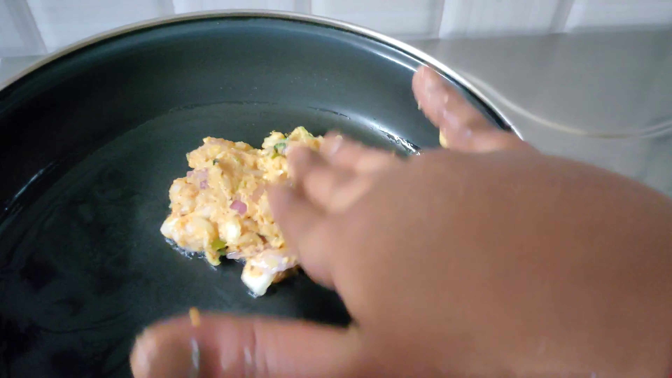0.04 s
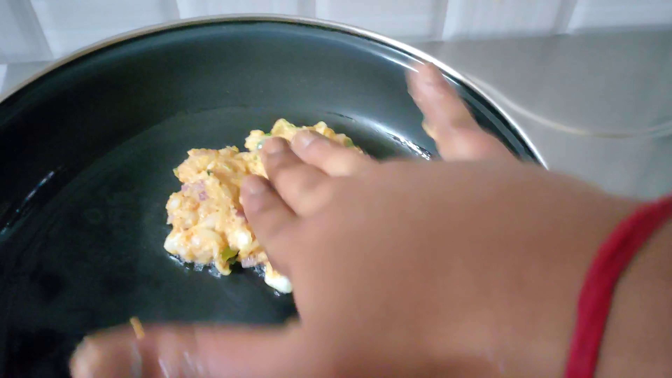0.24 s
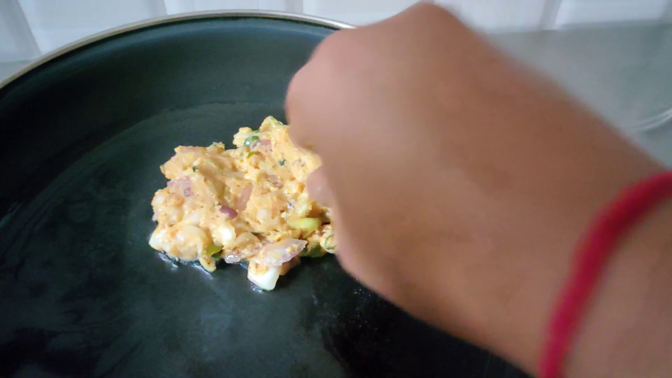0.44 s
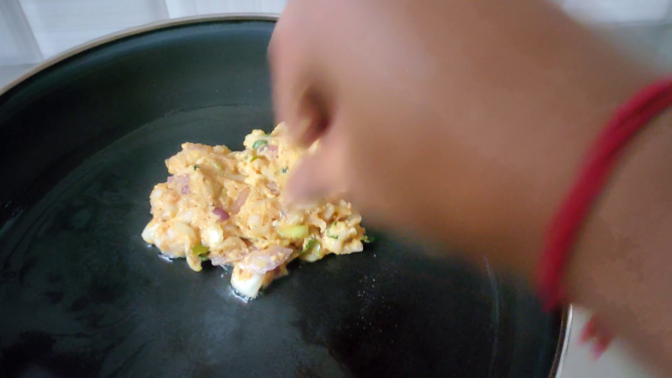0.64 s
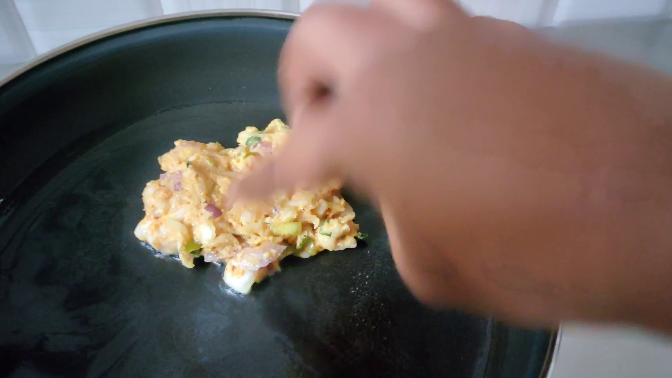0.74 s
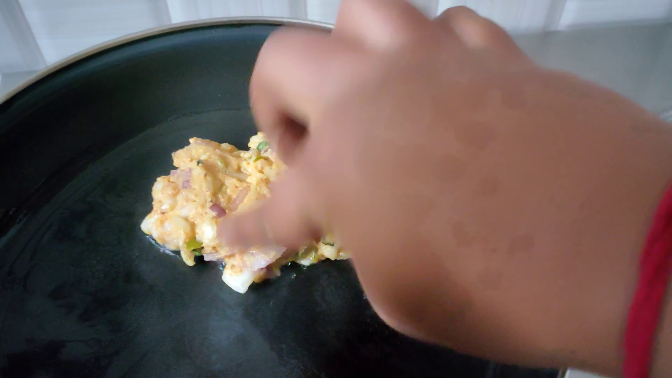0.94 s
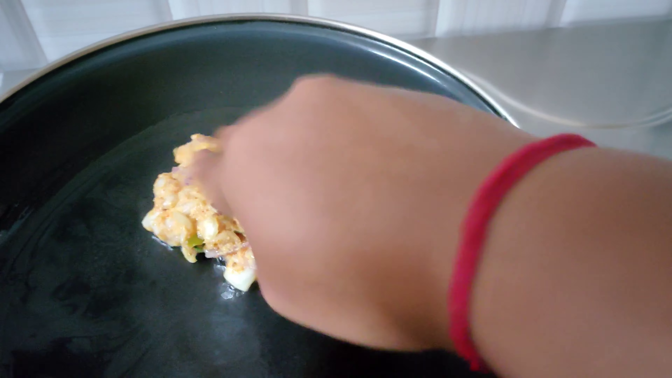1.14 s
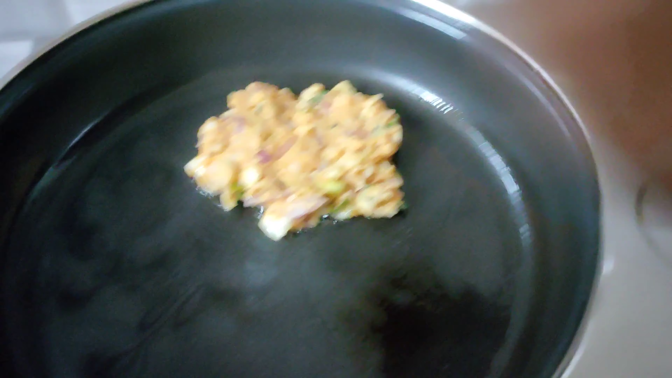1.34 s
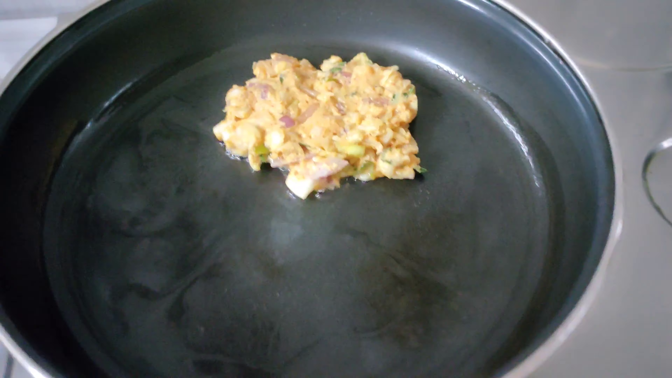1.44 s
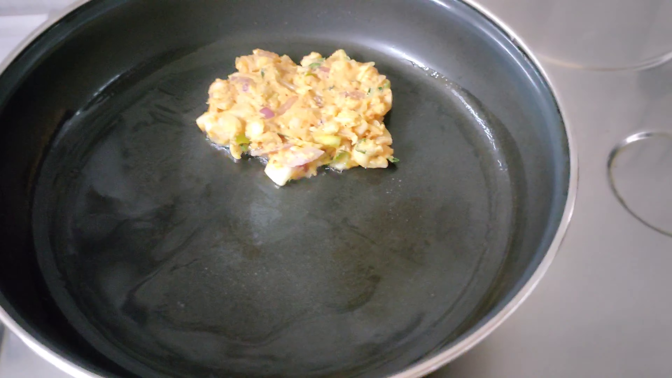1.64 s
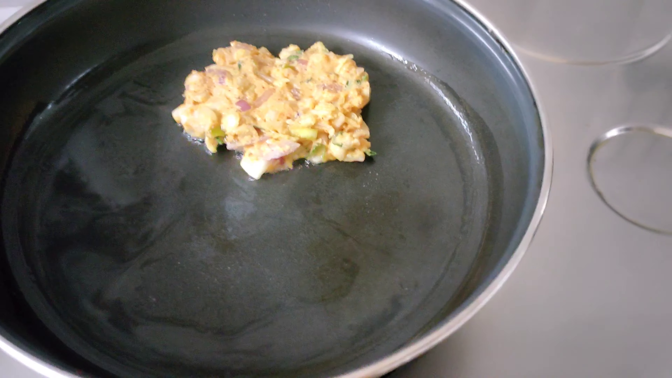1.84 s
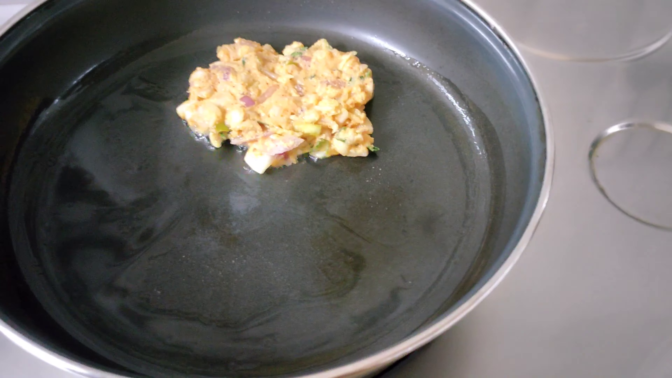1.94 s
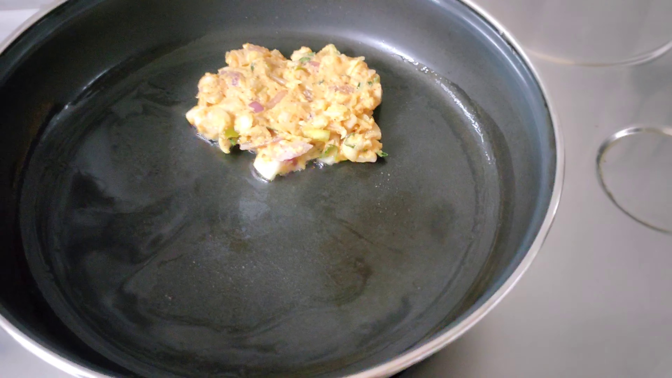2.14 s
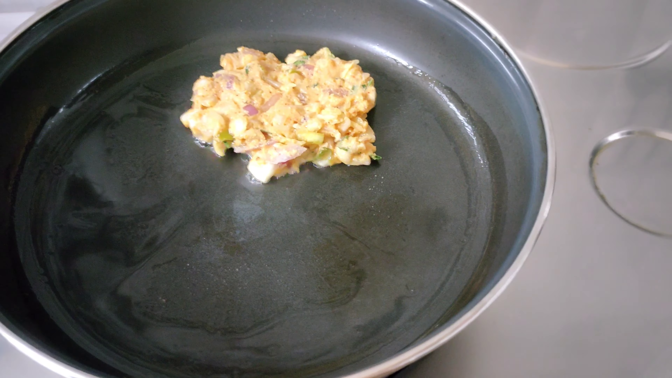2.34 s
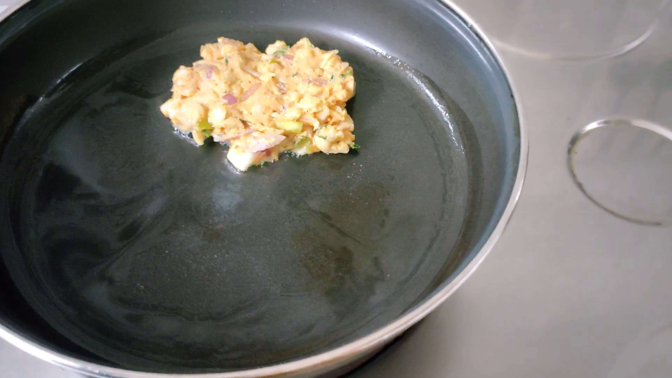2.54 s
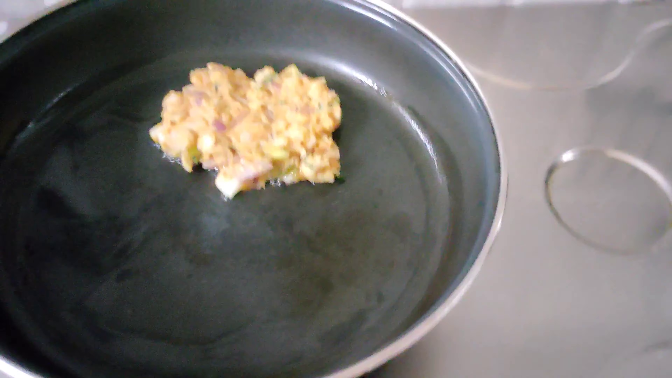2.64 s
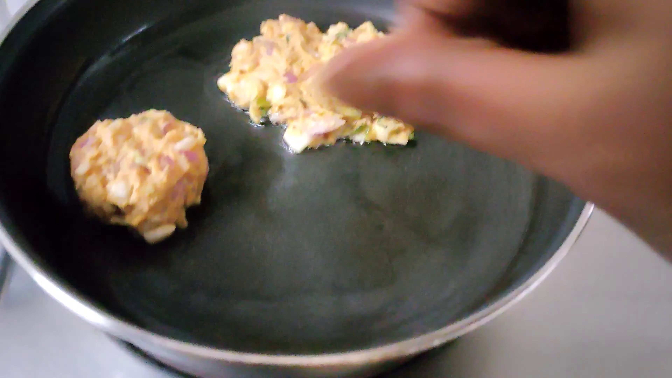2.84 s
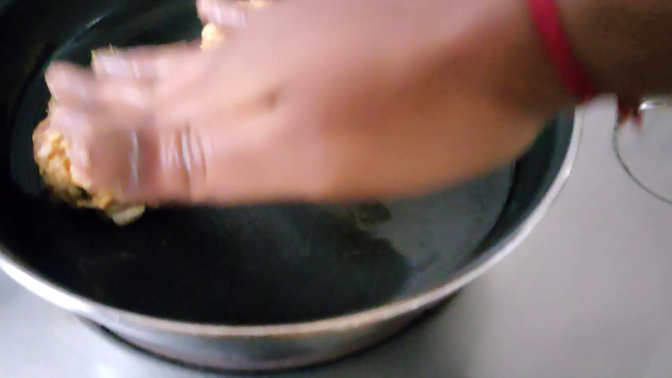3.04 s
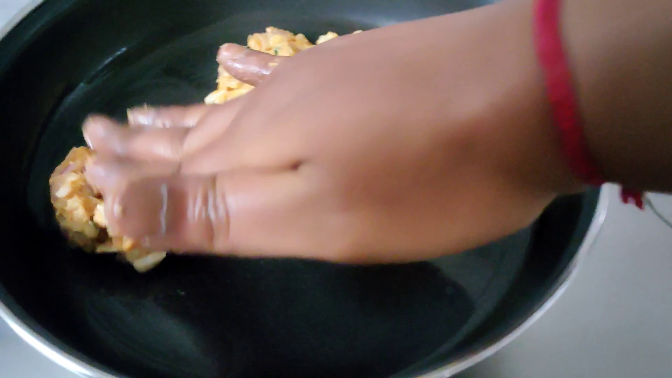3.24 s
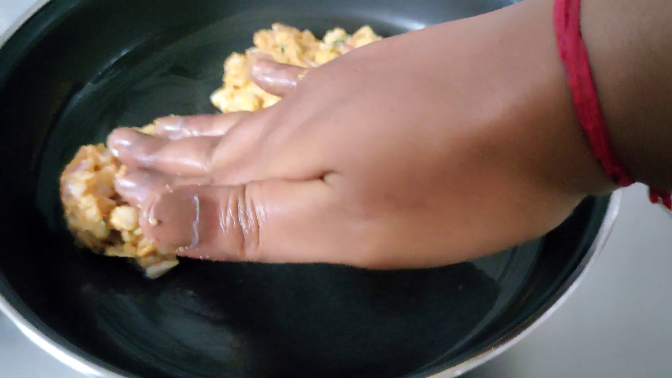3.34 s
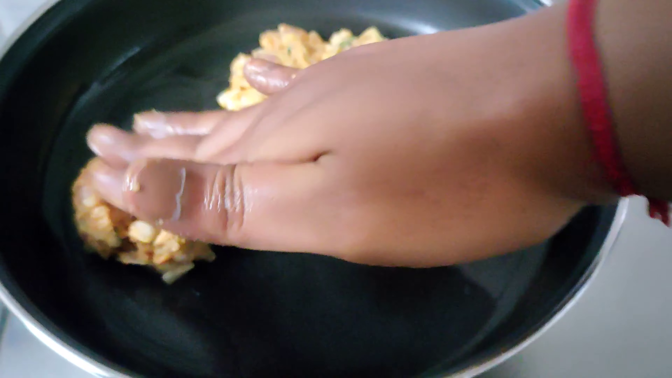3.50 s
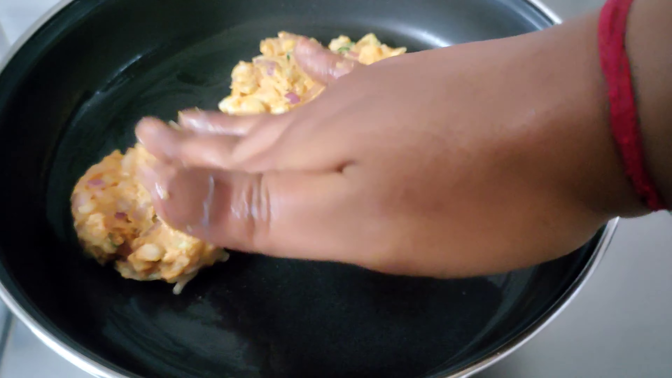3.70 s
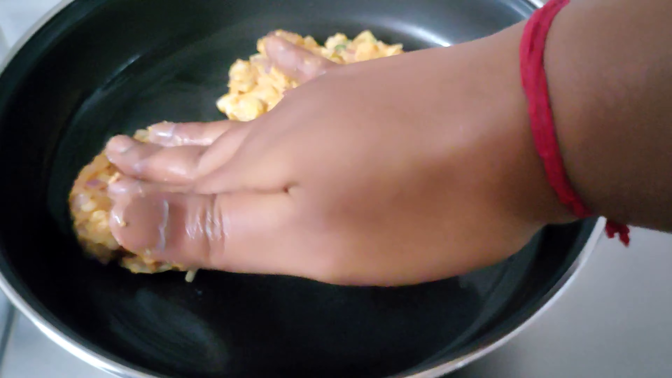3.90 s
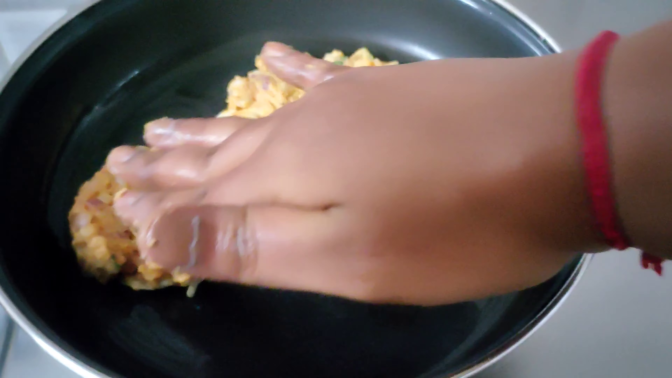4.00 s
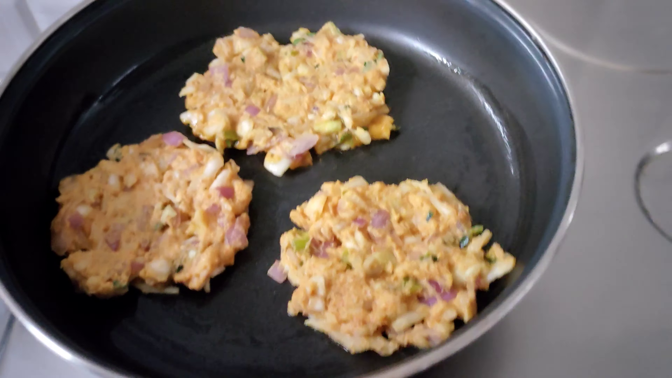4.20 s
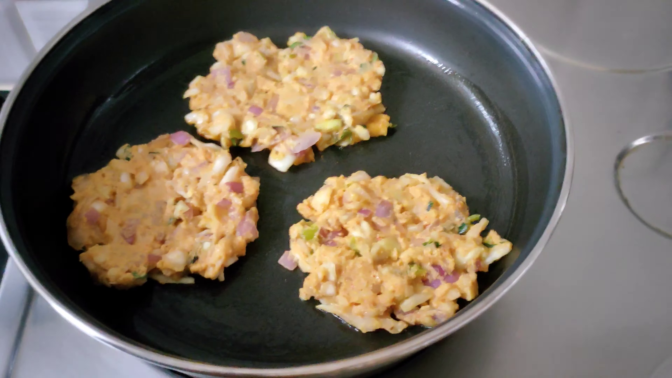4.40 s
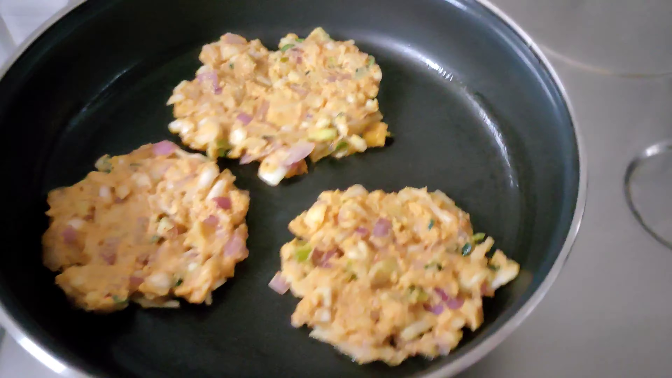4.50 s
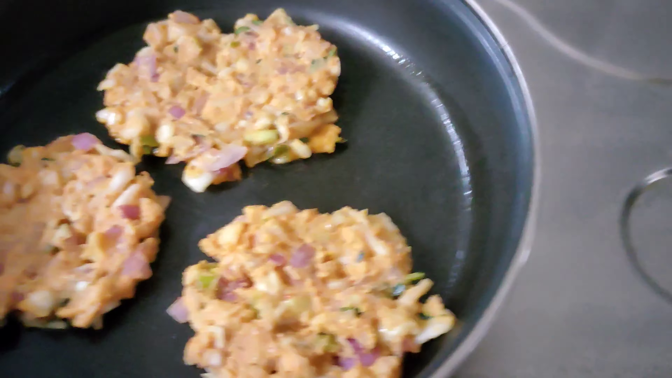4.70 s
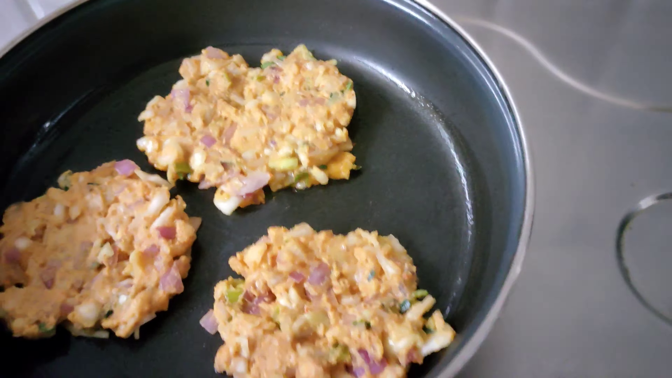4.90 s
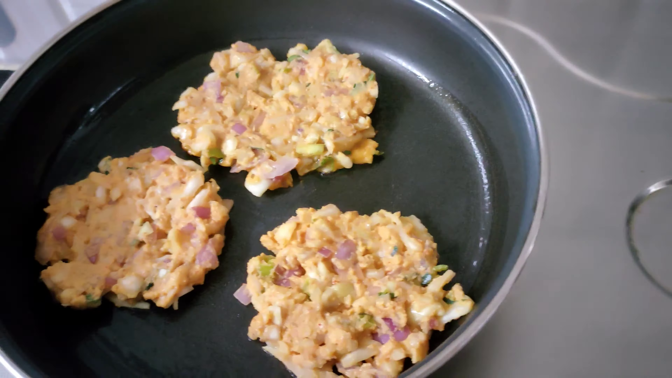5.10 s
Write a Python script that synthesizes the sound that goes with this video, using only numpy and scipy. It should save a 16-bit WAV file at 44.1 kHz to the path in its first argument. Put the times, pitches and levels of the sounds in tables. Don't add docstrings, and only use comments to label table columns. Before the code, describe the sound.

Close frying hiss over a low wavering hum, early loud oil pops, a burst of metallic pan knocks midway, then short scraping squeaks.

```python
import sys
import numpy as np
from scipy import signal
from scipy.fft import rfft, irfft, next_fast_len
from scipy.io import wavfile
from scipy.ndimage import uniform_filter1d

SR = 44100
rng = np.random.default_rng(int(sys.argv[2]) if len(sys.argv) > 2 else 0)


def wav_out(sig):
    wavfile.write(sys.argv[1], SR, np.round(np.clip(np.atleast_2d(sig).T, -1, 1) * 32767).astype(np.int16))


def volts_from_decibels(level):
    exponent = np.asarray(level, float) / 20
    return 10 ** exponent


N = 262395
FULL_PAN_S = 3.95

# freq_hz, level_db (per Hz)
HISS_THREE = [(190, -26), (330, -6), (671, -4.5), (1220, -6), (1550, -2.5), (1980, -4.5), (2600, -2),
              (3160, -5), (5740, 1.5), (9010, -6), (11100, -7), (13700, -16), (15600, -11)]
# freq_hz, width_hz, level_db
STAND = [(180, 165, -11.5), (221, 46, -2.5), (326, 40, 2), (387, 76, -2), (447, 35, 5), (589, 16, -7),
         (647, 22, -4.5), (750, 91, -4), (880, 105, -7), (1195, 83, -11), (1328, 30, -6.5),
         (1670, 140, -18.5), (1950, 180, -16.5)]
# freq_hz, level_db (per Hz)
CLATTER = [(590, -17.5), (1000, -8.5), (1350, -4.5), (2210, -9.5), (2690, -7.5), (3230, -11), (5870, -13),
           (8290, -23), (11400, -24.5), (14900, -38), (15600, -40)]


def evened(x):
    return x / np.sqrt(np.mean(x ** 2) + 1e-20)


def smooth_noise(shape, size):
    return evened(uniform_filter1d(rng.standard_normal(shape), size=size))


def read(points, hz):
    f, value = np.transpose(points)
    return np.interp(np.log(hz + 1), np.log(f + 1), value)


def columns(rows, t):
    s, *rest = np.transpose(rows)
    return [np.interp(t, s, c) for c in rest]


def add(mix, s, sound):
    part = mix[:, max(round(s * SR), 0):][:, :sound.shape[1]]
    part += sound[:, :part.shape[1]]


def ring(x, modes):
    out = np.zeros_like(x)
    for k, (hz, width, db) in enumerate(modes):
        r = np.exp(-np.pi * max(width, 5) / SR)
        poles = [1, -2 * r * np.cos(2 * np.pi * hz / SR), r * r]
        out += (-1) ** k * volts_from_decibels(db) * (1 - r) * signal.lfilter([1, 0, -r], poles, x)
    return out


def colour(x, points):
    size = next_fast_len(x.shape[-1])
    gain = volts_from_decibels(read(points, np.fft.rfftfreq(size, 1 / SR)))
    return irfft(rfft(x, size) * gain, size)[..., :x.shape[-1]]


def pair(size, same):
    a, b = rng.standard_normal((2, size))
    return np.array([a, same * a + np.sqrt(1 - np.clip(same, 0, 1) ** 2) * b])


def panned(db):
    return volts_from_decibels(np.array([[.5 * db], [-.5 * db]]))


def hiss():
    # start_s, level_db
    frying = [(0.0, -45.5), (0.238, -49), (1.12, -50.5), (1.14, -45.5), (1.225, -50), (1.346, -53.5),
              (1.58, -55.5), (1.95, -52.5), (2.452, -54), (2.97, -52.5), (2.99, -49.5), (3.254, -47),
              (3.454, -52.5), (3.804, -49), (3.96, -51.5), (4.226, -51.5), (5.074, -53), (5.95, -52.5)]
    # freq_hz, level_db (per Hz)
    hiss_one = [(190, -37), (330, -3), (562, -6.5), (629, 0), (828, -10.5), (1040, -1), (1850, 1.5),
                (2110, 0), (2400, 3), (4880, 2), (5830, 2.5), (11700, -7), (15600, -10.5)]
    # freq_hz, likeness (0 to 1)
    likeness = [(60, 0.97), (180, 0.71), (550, 0.66), (1650, 0.16), (4970, 0.018), (15000, 0.03)]
    calm_db = -53
    top_lag, wash_lag = 0.097, 0.51
    top_db, wash_db = (1.3, -2.5), (3.5, 2)

    frames, hz = N // 64 + 5, np.fft.rfftfreq(256, 1 / SR)[:, None]
    t = np.arange(frames) * 64 / SR
    a, b, c, d, patches = rng.standard_normal((frames, 129, 5)).T
    patches = evened(uniform_filter1d(uniform_filter1d(patches, size=5, axis=0), size=40, axis=1))
    flicker = smooth_noise(frames, 8)

    level_db, = columns(frying, t)
    full = np.clip((t - FULL_PAN_S) / 0.0205, 0, 1)
    bright_db = np.interp(full, (0, 1), top_db) - top_lag * (level_db - calm_db)
    low_db = np.interp(full, (0, 1), wash_db) - wash_lag * (level_db - calm_db)
    shape_db = (1 - full) * read(hiss_one, hz) + full * read(HISS_THREE, hz)
    shape_db -= 10 * np.log10((volts_from_decibels(shape_db[17:52]) ** 2).sum(0))
    shape_db += bright_db * np.clip((hz - 6500) / 4000, 0, 1)
    shape_db += low_db * np.clip((3000 - hz) / 1500, 0, 1)

    pops = rng.choice([-1, 1], N) * (rng.random((2, N)) < 300 / SR)
    pops = pops * volts_from_decibels(4.0 * np.minimum(rng.exponential(1, (2, N)), 4))
    pops = evened(pops + 0.059 * np.roll(pops[::-1], 6))
    crackle = signal.stft(pops, nperseg=256, noverlap=192)[2]
    crackle = np.pad(crackle, ((0, 0), (0, 0), (0, 8)))[:, :, :frames]
    crackle_db = -13.0 + 3.6 * np.clip((hz - 3000) / 5000, -1, 1)

    same, left = np.clip(read(likeness, hz), -1, 1), a + 1j * b
    z = np.array([left, same * left + np.sqrt(1 - same ** 2) * (c + 1j * d)])
    z += volts_from_decibels(crackle_db) * evened(abs(crackle)) * np.exp(1j * np.angle(crackle))
    uneven_db = 1.52 * patches + 0.36 * flicker * (4.0 - 0.61 * full)
    side_db = np.array([.5, -.5])[:, None, None] * (2.0 * full - 2.0) * (hz > 900)
    z *= volts_from_decibels(shape_db + level_db + uneven_db + side_db)
    return volts_from_decibels(2.5) * signal.istft(z, nperseg=256, noverlap=192)[1][:, :N]


def hum():
    # start_s, load_db (second tone), imbalance_db (first tone against the second)
    motor = [(0.0, -52.5, 4.5), (0.5, -59, -2), (0.53, -68, 13), (0.69, -51.5, 3), (0.99, -64.5, 11.5),
             (1.24, -51, -24), (2.15, -56.5, 4), (2.45, -73, 7), (2.48, -54, -11), (2.8, -47, -2),
             (3.89, -45.5, -2.5), (3.99, -62.5, 13), (4.19, -53, -2), (4.44, -63, 13), (4.56, -53, -1.5),
             (5.24, -73, 20), (5.29, -52.5, 2), (5.95, -52.5, 1)]
    # start_s, pitch_hz
    shaft = [(0, 97), (1.1, 99), (1.9, 92), (2.45, 86), (2.75, 92.3), (5.95, 92)]
    # freq_hz, level_db (per Hz)
    rumble_colour = [(8.8, -30), (20, -13), (38, -4), (92, -1), (111, -7.5), (141, -7), (283, -23.5),
                     (330, -38), (430, -37), (730, -120)]
    third_db = (-15.5, -5)
    throb_db, rumble_db, lumps_db = 2.5, -54.5, .8

    t = np.arange(N) / SR
    load_db, imbalance_db = columns(motor, t)
    waver = evened(uniform_filter1d(smooth_noise((3, 4, N), 5000), size=5000))
    orders_db = np.array([imbalance_db, 0 * t, np.where(t < FULL_PAN_S, *third_db)])
    orders_db = orders_db + load_db + 1.0 + throb_db * waver[2, :3]
    turns = np.cumsum(.5 * columns(shaft, t)[0]) / SR
    drift = np.array([[.08], [.08], [.3]]) * waver[0, :3]
    drift = drift + .05 * waver[1, :3] * [[[0]], [[1]]]
    lines = 0
    for k, db in enumerate(orders_db):
        lines = lines + volts_from_decibels(db) * np.sin(2 * np.pi * ((k + 1) * turns + drift[:, k]))
    rumble = evened(colour(pair(N, 0.98), rumble_colour)) * volts_from_decibels(rumble_db + lumps_db * waver[2, 3])
    return panned(-0.1) * (lines + rumble)


def taps():
    # start_s, peak_db, pitch_hz, t60_s (time to die by 60 dB), left_right_db
    tap_events = [(0.055, -47, 330, 0.021, 4), (0.099, -51, 440, 0.07, 3), (1.192, -57, 330, 0.073, 0.5),
                  (1.252, -79, 320, 0.025, -0.5), (0.226, -48, 530, 0.025, 4), (0.269, -57, 492, 0.025, 0),
                  (2.4, -57, 440, .04, 2), (2.568, -54.5, 312, 0.067, 9), (2.572, -57, 516, 0.036, -4),
                  (3.986, -37, 438, 0.025, -34), (4.061, -60, 900, 0.2, -2), (4.328, -36, 463, 0.027, -23),
                  (4.355, -48, 480, 0.021, -16), (4.398, -44.5, 447, 0.031, -18),
                  (4.418, -43, 400, 0.013, -16), (4.438, -38, 400, 0.018, -22), (5.1, -55, 265, 0.023, -5),
                  (5.306, -37.5, 446, 0.012, -28)]
    out, t = np.zeros((2, N)), np.arange(3000) / SR
    for s, db, hz, t60, pan_db in tap_events:
        cycles = hz * t * (1 + 0.64 * np.exp(-t / 0.0011))
        knock = volts_from_decibels(db + 6.5 - 60 * t / max(t60, .005)) * np.sin(2 * np.pi * cycles)
        add(out, s, panned(pan_db) / panned(pan_db).mean() * knock)
    return out


def spits():
    # start_s, peak_db, pitch_hz, spray_db (noise around the spit)
    spit_events = [(0.1695, -22, 5830, -29), (0.163, -35, 3400, -3), (0.1762, -12.5, 4460, -19.5),
                   (0.1772, -9, 5270, -43), (0.2164, -35.5, 3450, -3), (0.2661, -48, 11100, -25),
                   (0.373, -37, 4150, -4.5), (0.386, -34, 4900, -3.5), (0.5212, -32.5, 2360, -2.5),
                   (0.605, -35, 6400, -4.5), (0.75, -41.5, 5070, -1.5), (0.8186, -39.5, 5670, -2.5),
                   (1.006, -39, 5700, -7), (1.0733, -36, 2600, -2.5), (1.141, -39, 2560, -1),
                   (1.1696, -25, 5800, -18), (1.2096, -35, 4350, -6), (1.2584, -39, 1640, -7),
                   (1.5217, -37, 10300, -13), (1.9023, -27.5, 6350, -12.5), (2.099, -33, 3870, -24),
                   (2.3782, -33.5, 5700, -9.5), (2.6063, -42, 2370, -7), (2.6482, -25.5, 9900, -28),
                   (2.8479, -35, 9000, -19), (2.934, -35, 6000, -15), (3.3074, -31, 2390, -7),
                   (3.5811, -40, 4380, 0), (3.6082, -35, 3970, -9.5), (5.8584, -35, 5500, -21)]
    middle_db, scatter_db = -2.1, 3.5
    out, t = np.zeros((2, N)), np.arange(-900, 1800) / SR
    envelope = np.exp(-np.maximum(t / 0.01, -t / 0.0057))
    for s, db, hz, spray_db in spit_events:
        pan_db = middle_db + scatter_db * rng.standard_normal()
        burst = np.sin(2 * np.pi * hz * t) * np.exp(-np.maximum(t, 0) * hz / 2.5) * (t > 0)
        burst = 0.83 * np.array([np.roll(burst, 9), burst])
        spray = evened(ring(pair(len(t), 0.23), [(hz, 0.79 * hz, 0)])) * envelope
        add(out, s + t[0], volts_from_decibels(db) * panned(pan_db) * (burst + volts_from_decibels(spray_db) * spray))
    return out


def ticks():
    # start_s, peak_db, lower_edge_hz, left_right_db
    tick_events = [(.1713, -27, 6500, -3), (.1766, -18, 800, 0), (.2205, -26, 700, 2),
                   (.2661, -20, 4500, -3), (.386, -32, 900, 0), (.522, -33, 700, -1), (.606, -35, 5000, -1),
                   (.642, -38, 6000, -1), (1.0062, -38, 5000, 0), (1.1404, -26, 900, 0),
                   (1.258, -38, 800, 0), (1.522, -37, 8000, -2), (1.5285, -34, 6000, 0),
                   (1.9017, -27, 600, -1), (1.9019, -31, 5000, -1), (2.003, -38, 4000, 0),
                   (2.6485, -26, 7000, -2), (2.9353, -34, 4000, -1), (3.3085, -29, 1500, 0),
                   (3.7625, -30, 900, 0), (4.7128, -25, 500, 2), (.697, -38, 5000, -1),
                   (2.849, -36, 6000, 0)]
    span = 8
    out, click = np.zeros((2, N)), np.zeros((2, 200))
    for s, db, hz, pan_db in tick_events:
        step = np.r_[1, rng.uniform(-1, 1, 20) * np.exp(-np.arange(20) / 7)]
        click[0, 4:25], click[1, :21] = step, step
        band = signal.butter(2, [hz, min(span * hz, 17000)], "band", fs=SR)
        add(out, s, 2 * volts_from_decibels(db) * panned(pan_db) * signal.lfilter(*band, click))
    return out


def jolts():
    # start_s, peak_db, clatter_db (against the thud), t60_s (clatter dies by 60 dB)
    jolt_events = [(3.042, -23.5, -14, 0.096), (3.069, -29, -13.5, 0.1), (3.156, -18, -26, 0.14),
                   (3.157, -11.5, -16.5, 0.16), (3.171, -19, -9.5, 0.14), (3.188, -22, -4.5, 0.073),
                   (3.209, -30, -38, 0.082), (3.277, -21, -19, 0.075), (3.308, -28, -30.5, 0.11),
                   (3.415, -31.5, 0, 0.07), (3.415, -12, -20, 0.087), (3.43, -21.5, -9.5, 0.15),
                   (3.456, -24, -27, 0.11), (3.505, -28, -39, 0.032), (3.645, -36.5, -30, 0.046),
                   (3.681, -48, -8, 0.21), (3.744, -53, 6, 0.23), (3.766, -21, -14.5, 0.13),
                   (3.795, -29, -15.5, 0.31), (3.836, -15, -14.5, 0.077), (3.842, -26, -14, 0.08),
                   (3.882, -17, -15.5, 0.067), (3.903, -26, -17, 0.03)]
    rise, grain_db = .012, 1.8
    out, t = np.zeros((2, N)), np.arange(8000) / SR
    high_gain = volts_from_decibels(2.0) / np.std(colour(pair(SR, 0.87), CLATTER))
    for s, db, bright_db, t60 in jolt_events:
        decay_db = 60 * np.maximum(t - rise, 0) / np.clip(t60, .02, .4)
        envelope = volts_from_decibels(db - decay_db) * np.clip(t / rise, 0, 1) ** 0.44
        envelope *= volts_from_decibels(2.67 * smooth_noise(len(t), 90))
        seat = np.array(STAND) * (1 + rng.standard_normal((len(STAND), 1)) * (.025, 0, 0))
        thud = evened(ring(envelope * pair(len(t), 0), seat))
        thud = volts_from_decibels(-9.0) * np.sqrt(np.mean(envelope ** 2)) * thud
        grains = evened(volts_from_decibels(grain_db * np.repeat(rng.exponential(1, 160).clip(0, 4), 50)))
        clatter = high_gain * volts_from_decibels(bright_db) * colour(envelope * grains * pair(len(t), 0), CLATTER)
        add(out, s + .005 - rise, thud + clatter)
    return ports(out + strikes())


def strikes():
    # start_s, peak_db
    strike_events = [(3.048, -16.5), (3.157, -9), (3.16, -14), (3.166, -7), (3.17, -14), (3.175, -14),
                     (3.19, -8.5), (3.201, -20), (3.209, -17), (3.278, -21), (3.308, -25), (3.413, -19),
                     (3.418, -14.5), (3.431, -16.5), (3.441, -19), (3.466, -20), (3.508, -25.5),
                     (3.518, -37), (3.77, -23), (3.832, -18), (3.84, -14), (3.883, -15.5), (3.888, -22),
                     (3.906, -17)]
    level_db, damp, snap_db = -7.5, 2.8, -12
    out, kick = np.zeros((2, N)), np.zeros((2, 3000))
    kick[0, 100:108] = kick[1, 135:143] = 1
    body = ring(kick, np.array(STAND) * (1, damp, 1))
    snap = colour(kick, CLATTER)
    blow = body / abs(body).max() + volts_from_decibels(snap_db) * snap / abs(snap).max()
    for k, (s, db) in enumerate(strike_events):
        add(out, s - 100 / SR, (-1) ** k * volts_from_decibels(db + level_db) * blow)
    return out


def ports(x):
    # freq_hz, likeness (0 to 1)
    near_same = [(200, 0.91), (400, 0.92), (750, 0.69), (1400, 0.16), (3000, 0.038), (8000, 0.089)]
    size = next_fast_len(N)
    hz, (a, b) = np.fft.rfftfreq(size, 1 / SR), rfft(x, size)
    same = np.clip(read(near_same, hz), 0, 1)
    right = (same * a + np.sqrt(1 - same ** 2) * b) * np.exp(2j * np.pi * hz * 6 / SR)
    return irfft(np.array([a, right]), size)[:, :N]


def slides():
    # freq_hz, width_hz, level_db
    rim_modes = [(770, 150, 8), (893, 64, 2.5), (497, 130, -5), (325, 170, -2)]
    # freq_hz, width_hz, level_db
    base_modes = [(1640, 59, -15), (2060, 110, -4.5), (2560, 110, -14), (3004, 68, -6)]
    # freq_hz, width_hz, level_db
    squeal_early = [(3710, 95, 0), (4690, 110, 11), (5830, 120, 3.5), (6600, 350, -6), (7200, 190, -17)]
    # freq_hz, width_hz, level_db
    squeal_late = [(3570, 36, 2), (4850, 120, 10), (5880, 90, 0), (6620, 440, 0), (7400, 190, -10)]
    rub_db, late_rub_db = -5, -8
    scratch, grit = .6, .6

    late = np.arange(N) >= 5.39 * SR
    rim_gain, squeal_gain, rim_hz = pushes()
    slips = volts_from_decibels(3.1 * smooth_noise(N, 150))
    rub = pair(N, 0)
    tone = np.sqrt(2) * np.sin(2 * np.pi * np.cumsum(rim_hz) / SR + np.array([[0], [.6]]))
    waver = volts_from_decibels(2.0 * smooth_noise(N, 400))
    rim = tone * waver + scratch * evened(ring(pair(N, 0.55), rim_modes))
    rim = rim * rim_gain * panned(-0.61)
    base = evened(ring(rub, base_modes)) * volts_from_decibels(rub_db + late_rub_db * late)
    squeal = np.where(late, evened(ring(rub, squeal_late)), evened(ring(rub, squeal_early)))
    squeal = evened(squeal + grit * evened(colour(rub, HISS_THREE))) * panned(0.77)
    return rim + (base + squeal) * squeal_gain * slips


def pushes():
    # start_s, push_s, ring_db, pitch_hz, t60_s (once released)
    ring_events = [
        (4.709, 0.028, -38.5, 770, 0.18),
        (4.784, 0.022, -44.5, 750, 0.076),
        (5.327, .026, -43.5, 756, 0.033),
        (5.352, 0.024, -42.5, 746, 0.054),
        (5.396, 0.034, -55, 722, .15),
        (5.428, 0.021, -52, 762, 0.22),
        (5.474, 0.013, -44, 742, 0.072),
        (5.492, 0.023, -53, 770, .06),
    ]
    # start_s, hold_s, squeal_db, rise_s
    squeal_events = [
        (4.711, .016, -31, .002),
        (4.77, 0.03, -48.5, .002),
        (5.342, 0.015, -42.5, .006),
        (5.365, 0.019, -50, 0.0043),
        (5.407, .025, -47, .01),
        (5.427, 0.059, -41, .01),
        (5.465, 0.033, -38, 0.014),
    ]
    rim_rise_s, squeal_t60_s = 0.014, 0.09
    sag_hz_per_s, tires_db_per_s = 146, 62

    t = np.arange(N) / SR
    start, length, rim_db, hz, t60 = np.transpose(ring_events)[:, :, None]
    fade_db = 60 * np.maximum(t - start - length, 0) / t60
    rim = np.clip((t - start) / rim_rise_s, 0, 1) ** 2 * volts_from_decibels(rim_db - fade_db)
    lead = rim.argmax(0)
    pitch = hz[lead, 0] - sag_hz_per_s * (t - start[lead, 0]).clip(0, .1)
    start, length, squeal_db, rise = np.transpose(squeal_events)[:, :, None]
    fade_db = tires_db_per_s * (t - start).clip(0)
    fade_db = fade_db + 60 * np.maximum(t - start - length, 0) / squeal_t60_s
    squeal = np.clip((t - start) / np.maximum(rise, .001), 0, 1) * volts_from_decibels(squeal_db - fade_db)
    return rim.max(0), squeal.max(0), pitch


def kitchen(x):
    t = np.arange(9000) / SR
    echoes = rng.choice([-1., 1.], (2, len(t))) * (rng.random((2, len(t))) < 2000 / SR) * (t > .003)
    tail = echoes * volts_from_decibels(-60 * t / 0.28)
    return signal.oaconvolve(x, tail / np.linalg.norm(tail[0]), axes=1)[:, :N]


def scene():
    near, sliding = spits() + ticks() + jolts(), slides()
    room = volts_from_decibels(-13) * kitchen(near + .4 * sliding)
    return near + sliding + room + taps() + hiss() + hum()


def thin_out(x):
    # freq_hz, threshold_db
    lost = [(700, -20.5), (1500, -8), (3200, -2), (6000, -6), (10000, -1.5), (12700, 3), (14000, 3.5),
            (15500, 3)]
    # freq_hz, chance (0 to 1)
    starved = [(2000, 0), (3200, .02), (9000, .004), (12000, .02), (13200, .12), (15000, .06)]
    left, right = x
    hz, _, z = signal.stft(np.array([left + right, left - right]), SR, nperseg=2048, noverlap=1024)
    local = np.sqrt(uniform_filter1d(abs(z) ** 2, size=32, axis=1))
    treble = uniform_filter1d(np.pad(np.diff(left + right, 2) ** 2, (1024, 3072)), size=32)
    frames = np.lib.stride_tricks.sliding_window_view(treble, 2048)[::1024][:z.shape[2]]
    attack = frames.max(1) > 30 * np.median(frames, 1)
    strong = abs(z) > local * volts_from_decibels(read(lost, hz))[:, None]
    kept = z * (strong | attack) * (hz < 15530)[:, None]
    left_over = np.sqrt(abs(uniform_filter1d(abs(kept) ** 2, size=32, axis=1)) + 1e-20)
    kept *= np.minimum(local / left_over, 2)
    draws = rng.random((65, z.shape[2] // 2 + 1))
    draws = np.repeat(np.repeat(draws, 16, axis=0), 2, axis=1)[:len(hz), :z.shape[2]]
    kept *= (draws > read(starved, hz)[:, None]) | attack
    mid, side = signal.istft(kept, SR, nperseg=2048, noverlap=1024)[1][:, :N]
    return .5 * np.array([mid + side, mid - side])


def roll_off(x):
    return signal.sosfilt(signal.butter(12, 15830, fs=SR, output="sos"), x)


def record(dry):
    # freq_hz, left_right_db
    tilt = [(60, 0.5), (150, -1), (380, 0), (950, -0.5), (2380, 3), (5980, 3.5), (15000, -5)]
    left = colour(dry[0], [(hz, .5 * db) for hz, db in tilt])
    right = colour(dry[1], [(hz, -.5 * db) for hz, db in tilt])
    return roll_off(thin_out(np.array([left, right])))


dry = scene()
out = record(dry)
wav_out(out)
```